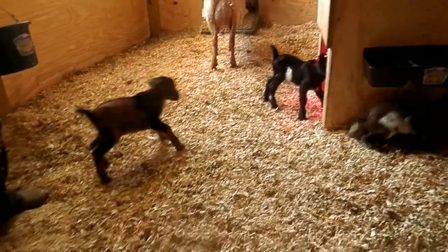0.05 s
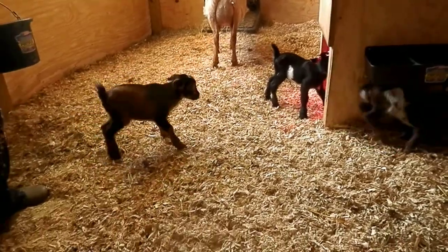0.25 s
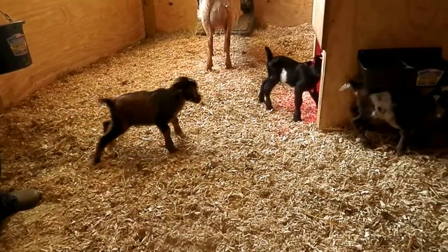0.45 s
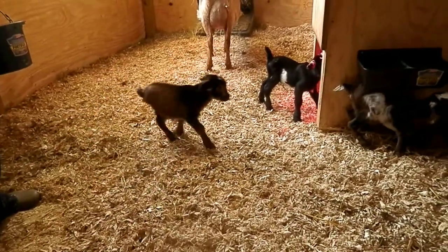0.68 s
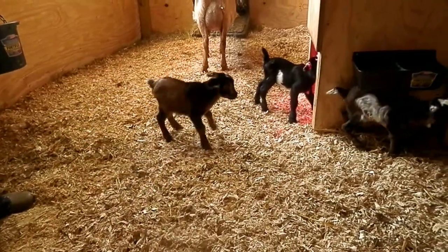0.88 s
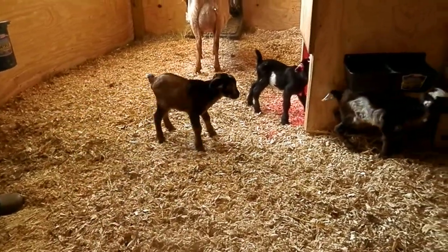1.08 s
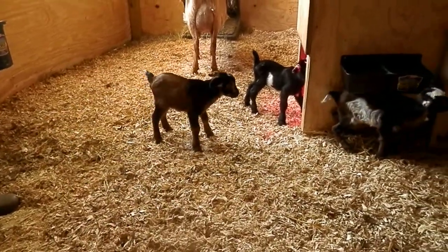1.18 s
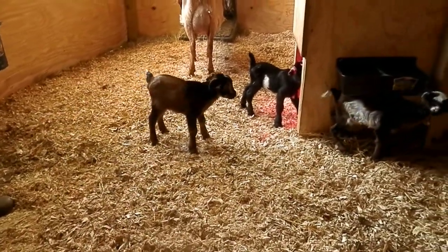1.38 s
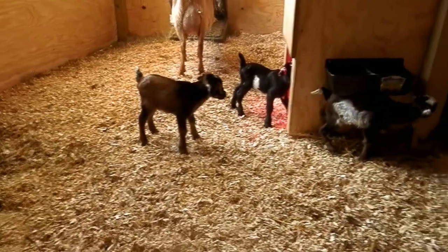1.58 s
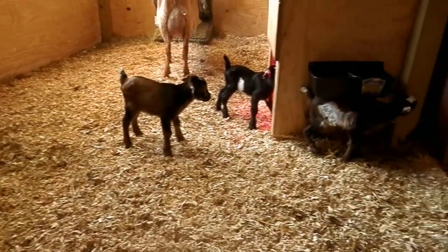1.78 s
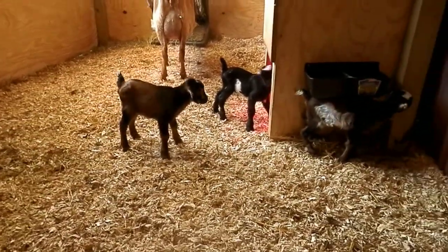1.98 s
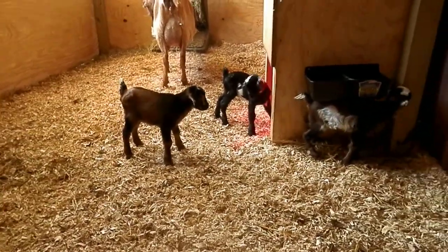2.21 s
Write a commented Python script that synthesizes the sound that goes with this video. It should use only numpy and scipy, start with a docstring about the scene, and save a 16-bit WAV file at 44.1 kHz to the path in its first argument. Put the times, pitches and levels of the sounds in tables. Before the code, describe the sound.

A goat kid's hooves thump and rustle on straw in a wooden pen.

```python
"""A straw-bedded barn pen, one microphone a couple of metres from the goat kids.
One kid bounds across, lands, hops twice and settles. Each cushioned hoof thumps the floor and sets
the wooden pen booming; the hard landings also knock the boards. Straw crunches and snaps underfoot,
and rustles and scuffs as the kids shift, over the low murmur of the barn's air."""
import sys
import numpy as np
from scipy import signal
from scipy.fft import rfft, irfft
from scipy.io import wavfile

SR = 44100
rng = np.random.default_rng(int(sys.argv[2]) if len(sys.argv) > 2 else 0)


def wav_record(signal):
    """Record a signal, one row per channel, as 16-bit PCM in the file named by sys.argv[1]."""
    frames = np.transpose(np.atleast_2d(signal))
    bounded = np.clip(frames, -1, 1)
    # unit amplitude maps onto the largest positive 16-bit level
    quanta = np.round(bounded * 32767).astype(np.int16)
    wavfile.write(sys.argv[1], SR, quanta)


N = 99225
T = np.arange(N) / SR
HZ = np.fft.rfftfreq(2 * N, 1 / SR) + 1e-6


def undb(db):
    """Decibels to gain."""
    return 10 ** (np.asarray(db) / 20)


def unit(x):
    """Scale to rms 1."""
    return x / np.sqrt(np.mean(x ** 2))


def filtered(x, response):
    """Pass a sound through a frequency response."""
    return irfft(rfft(x, 2 * N) * response)[:N]


def resonance(hz, width):
    """Response of one damped resonance, gain 1 at its centre."""
    return 1 / (1 + 1j * (HZ ** 2 - hz ** 2) / (HZ * width))


def colour(points):
    """Causal response through (Hz, dB) points, with a power gain of 1."""
    hz, db = np.array(points, float).T
    gain = unit(undb(np.interp(np.log(HZ), np.log(hz), db)))
    cepstrum = irfft(np.log(gain))
    return np.exp(rfft(np.r_[cepstrum[0], 2 * cepstrum[1:N]], 2 * N))


def swell(at, rise, decay):
    """Exponential rise to a peak, then exponential decay."""
    return np.exp(-np.maximum((at - T) / rise, (T - at) / decay))


def tail(x, decay_s):
    """Diffuse reflections that build quickly and die away."""
    reflections = rng.standard_normal(N) * np.exp(-T / decay_s) * (1 - np.exp(-T / 0.0063))
    return filtered(x, rfft(reflections / np.linalg.norm(reflections), 2 * N))


def fractures(per_second=7000, spread_db=3):
    """Dense tiny breaks in straw, most weak and a few strong."""
    size = undb(spread_db * np.minimum(rng.exponential(size=N), 5))
    breaks = rng.random(N) < per_second / SR
    return unit(breaks * size * rng.choice([-1, 1], N))


# The barn's room tone. Each row: frequency in Hz, relative level in dB.
AIR_COLOUR = [(12, -14), (22, -1), (35, -14), (70, -7), (100, -4), (150, -7.5), (220, -9.5), (300, -10),
              (380, -19.5), (480, -18.5), (720, -22.5), (850, -28), (1200, -33), (1600, -45), (2700, -51.5),
              (4500, -66.5), (8000, -61.5), (10500, -79.5), (12500, -67.5), (15500, -49.5)]
# Narrow drones within it. Each row: centre in Hz, resonance width in Hz, level in dB.
AIR_DRONES = [(52.8, 6.3, -50), (418, 13, -59)]

def barn_air(murmur_db=-45):
    """A steady low murmur with faint drones, all around the microphone."""
    drones = sum(undb(db) * unit(filtered(rng.standard_normal(N), resonance(hz, width) ** 2))
                 for hz, width, db in AIR_DRONES)
    murmur = undb(murmur_db) * filtered(rng.standard_normal(N), colour(AIR_COLOUR))
    return murmur + drones


# Legs in the straw. Each row: peak time in seconds, tip level in dB, stalk level in dB,
# rise and decay in seconds.
STRAW_RUSTLES = [(.03, -65.5, -68.5, 0.09, 0.11), (0.179, -65, -69.5, 0.016, .06),
                 (0.246, -51.5, -47.5, 0.0062, 0.011), (.285, -58, -58, 0.0077, 0.019),
                 (.39, -64.5, -59, 0.042, 0.067), (0.491, -70.5, -59.5, 0.069, 0.083),
                 (0.574, -69.5, -65, .02, 0.033), (0.681, -67.5, -71, 0.051, 0.12),
                 (.746, -68, -66, 0.018, 0.017), (0.816, -74, -64.5, 0.0072, 0.022),
                 (0.934, -64, -66, 0.001, 0.017), (.963, -63.5, -61, 0.023, 0.044),
                 (1.06, -83.5, -71.5, 0.011, 0.038), (1.10, -71, -71, .012, 0.015),
                 (1.305, -79, -76, 0.036, 0.091), (1.513, -75.5, -67, 0.035, 0.015),
                 (1.612, -80.5, -79.5, 0.04, 0.19), (1.80, -83, -73.5, 0.022, .02),
                 (1.90, -85, -73, 0.02, 0.027), (2.095, -85, -87, 0.012, 0.033),
                 (2.245, -81, -76, 0.045, .03)]
# Crisp tips, then thicker stalks. Each row: frequency in Hz, relative level in dB.
CRISP_TIP_COLOUR = [(2000, -21), (4500, -19.5), (6300, -3), (8300, 3.5), (9400, 1), (11000, -9),
                    (15000, -7.5)]
THICK_STALK_COLOUR = [(300, -10), (600, 3.5), (1100, 1), (1700, -4.5), (2600, -6.5), (4000, -10),
                      (6500, -9.5), (10000, -33.5), (15000, -25)]

def straw_rustle():
    """Tips and stalks crackle as a leg crushes or brushes them."""
    tip_swells = sum(undb(db) * swell(at, rise, decay) for at, db, _, rise, decay in STRAW_RUSTLES)
    stalk_swells = sum(undb(db) * swell(at, rise, decay) for at, _, db, rise, decay in STRAW_RUSTLES)
    tips = filtered(tip_swells * fractures(), colour(CRISP_TIP_COLOUR))
    stalks = filtered(stalk_swells * fractures(), colour(THICK_STALK_COLOUR))
    return tips + stalks


# Stalks breaking underfoot. Each row: time in seconds, level in dB.
STALK_SNAPS = [(0.0247, -62), (0.243, -43.5), (0.258, -51), (0.5626, -51), (.597, -53.5), (.612, -49.5),
               (0.637, -60.5), (0.8123, -68), (.825, -65), (.933, -63), (1.043, -59.5), (1.054, -63.5),
               (1.0974, -68)]
# Their bright click. Each row: frequency in Hz, relative level in dB.
STALK_SNAP_COLOUR = [(1000, -12.5), (3000, -8), (5500, -5), (8300, 7), (11000, -3), (15000, -18.5)]

def straw_snaps(rise_s=0.00024, decay_s=0.0026):
    """A single stalk gives way in a very short burst of noise."""
    bursts = sum(undb(db) * swell(at, rise_s, decay_s) for at, db in STALK_SNAPS)
    return filtered(bursts * rng.standard_normal(N), colour(STALK_SNAP_COLOUR))


# Low thuds: hooves on the floor and their quick echoes off the walls. Each row: start in seconds,
# pitch in Hz (higher for a harder contact), level in dB before the pen resonates.
LOW_THUDS = [(0.029, 115.5, -49.5), (0.2018, 96, -30.5), (0.2383, 172.3, -21.5), (0.2746, 95.2, -23.5),
             (0.3246, 115.4, -19.5), (0.3392, 91, -26), (0.4289, 108.3, -20.5), (0.4605, 119, -38),
             (0.5236, 105, -42.5), (0.609, 93, -44.5), (0.676, 90, -43), (0.7417, 120.5, -27),
             (0.7746, 105.7, -24), (1.1055, 120, -30.5), (1.575, 120, -47), (1.7016, 103.5, -40),
             (1.8097, 106.4, -42.5)]
# Resonances of the floor and wooden pen. Each row: frequency in Hz, width in Hz, gain in dB.
PEN_RESONANCES = [(63.43, 1.8, 20.5), (96.35, 9, 15), (129.1, 8.1, 18), (159.6, 6.9, 14.5),
                  (201.5, 18.7, 22), (242, 6, -5), (295, 55, 11.5)]

def thuds(cycles_to_peak=0.79, tail_db=-24):
    """Each thud, a hoof or its wall echo, lasts a cycle or two; floor and pen ring on."""
    pulses = np.zeros(N)
    for at, hz, db in LOW_THUDS:
        cycles = np.maximum(T - at, 0) * hz
        envelope = cycles / cycles_to_peak * np.exp(1 - cycles / cycles_to_peak)
        pulses -= undb(db) * envelope * np.sin(2 * np.pi * cycles)
    pen = 1 + sum(undb(db) * resonance(hz, width) for hz, width, db in PEN_RESONANCES)
    boom = filtered(pulses, pen)
    return boom + undb(tail_db) * tail(boom, decay_s=0.13)


# Knocks on the boards. Each row: peak time in seconds, level in dB, rise and decay in seconds.
BOARD_KNOCKS = [(0.246, -32, .002, 0.017), (.329, -26, 0.009, 0.006), (0.333, -22, 0.042, 0.037),
                (.432, -36.5, 0.0021, 0.084), (.744, -37, 0.0019, .02), (0.778, -36.5, 0.00224, 0.024),
                (1.11, -41, 0.0023, 0.045)]
# Their dull wooden tone. Each row: frequency in Hz, relative level in dB.
BOARD_COLOUR = [(100, -28), (220, 7.5), (330, -3.5), (450, -4), (520, -11), (600, -9.5), (780, -16.5),
                (950, -35.5), (1500, -44), (3000, -76.5)]

def boards():
    """The boards clatter under the harder landings."""
    force = sum(undb(db) * swell(at, rise, decay) for at, db, rise, decay in BOARD_KNOCKS)
    return filtered(force * rng.standard_normal(N), colour(BOARD_COLOUR))


# Scrapes along the floor. Each row: peak time in seconds, level in dB, rise and decay in seconds.
HOOF_SCUFFS = [(0.934, -49, 0.0029, 0.013), (.97, -48, 0.027, 0.11), (1.507, -54.5, 0.018, 0.029)]
# Their hollow tone. Each row: frequency in Hz, relative level in dB.
HOOF_SCUFF_COLOUR = [(200, -18.5), (450, 8), (700, 5.5), (1100, -3), (1500, -11), (2200, -19.5),
                     (3200, -38), (6000, -41)]

def scuffs():
    """A hoof dragged through the bedding makes a grainy scrape."""
    drag = sum(undb(db) * swell(at, rise, decay) for at, db, rise, decay in HOOF_SCUFFS)
    return filtered(drag * fractures(), colour(HOOF_SCUFF_COLOUR))


def scene(walls_db=-10.5):
    """The pen in mono from a couple of metres; the walls briefly answer the straw."""
    footfalls = thuds() + boards() + scuffs()
    straw = straw_rustle() + straw_snaps()
    walls = undb(walls_db) * tail(straw, decay_s=0.045)
    return (footfalls + straw + walls + barn_air())[None]


def record(dry, top_hz=15750):
    """The recorder behind the microphone cuts the highest treble steeply."""
    return signal.sosfilt(signal.ellip(10, 0.2, 80, top_hz, fs=SR, output="sos"), dry)


dry = scene()
out = record(dry)
wav_record(out)
```